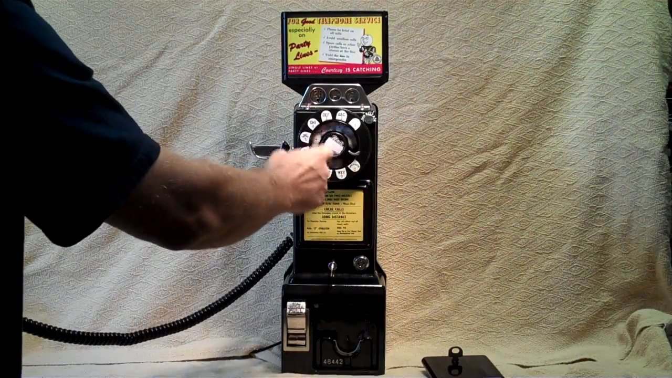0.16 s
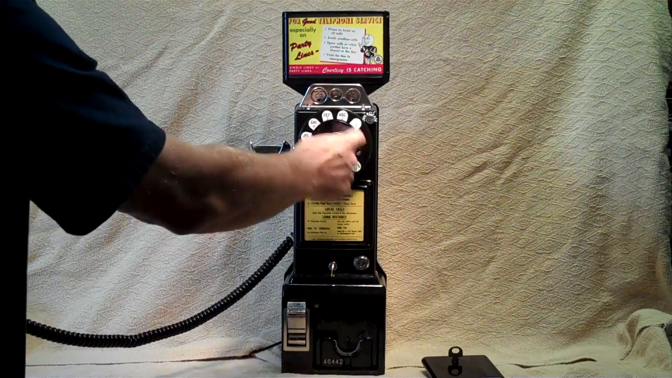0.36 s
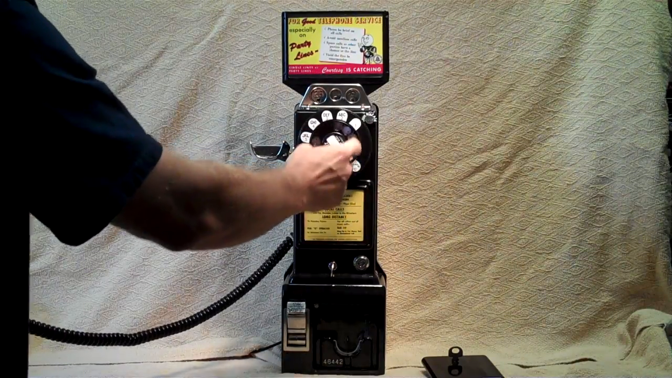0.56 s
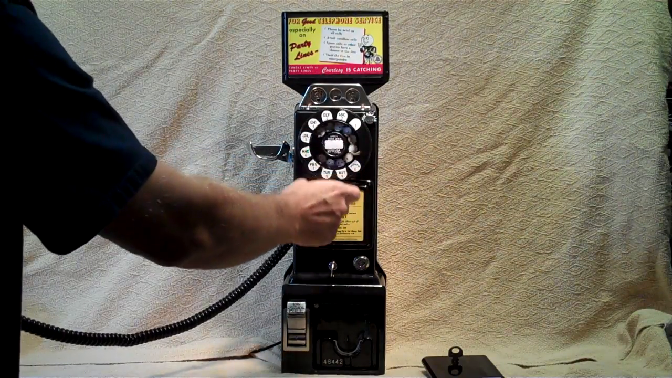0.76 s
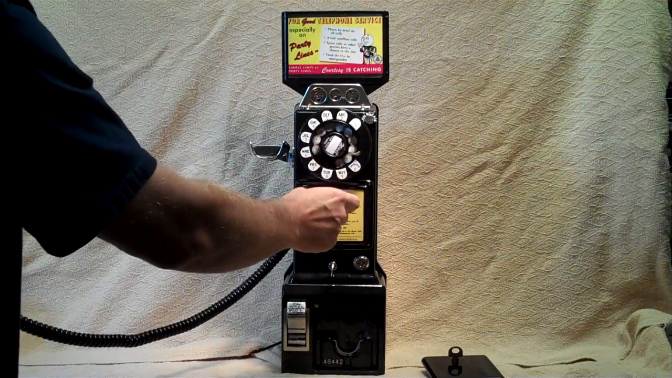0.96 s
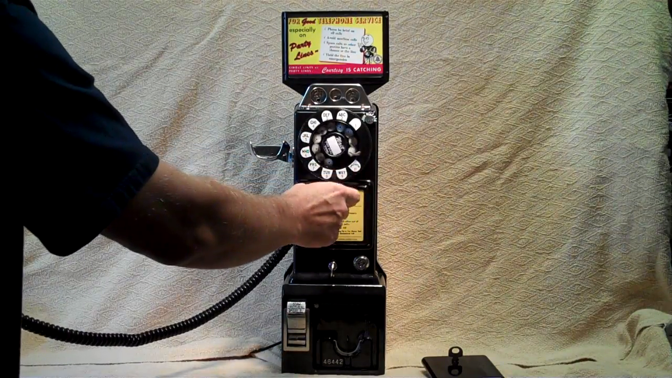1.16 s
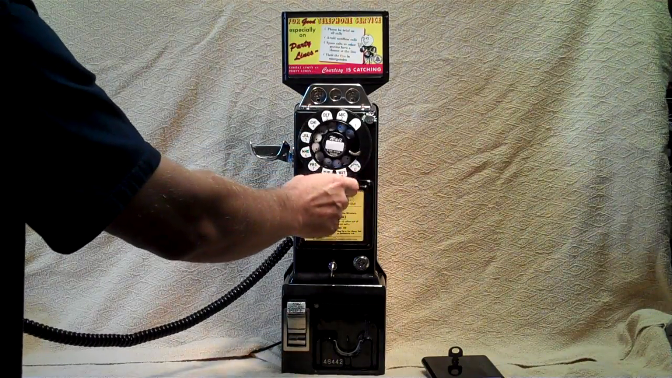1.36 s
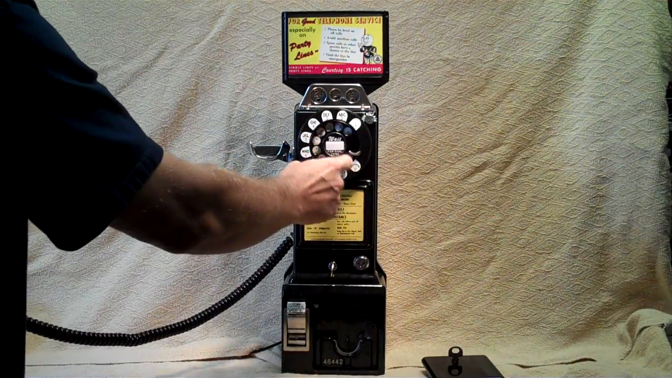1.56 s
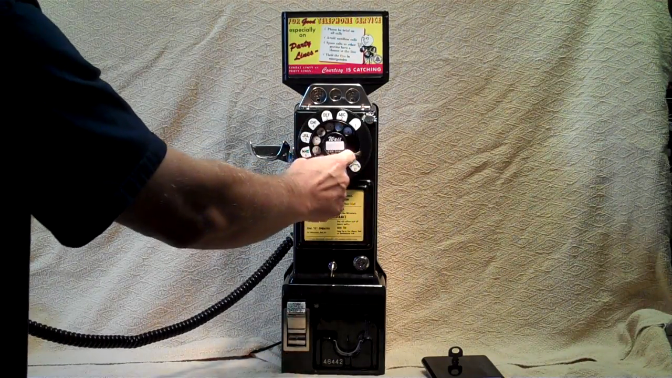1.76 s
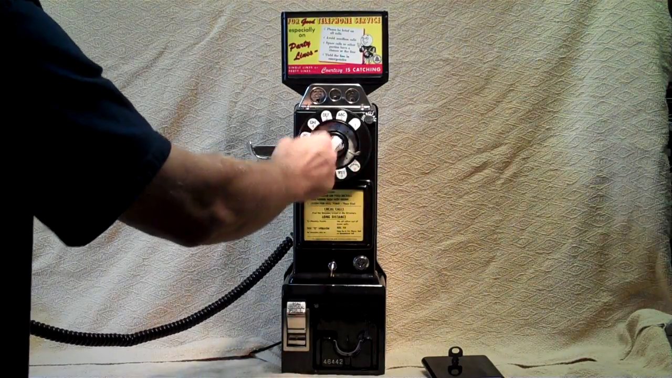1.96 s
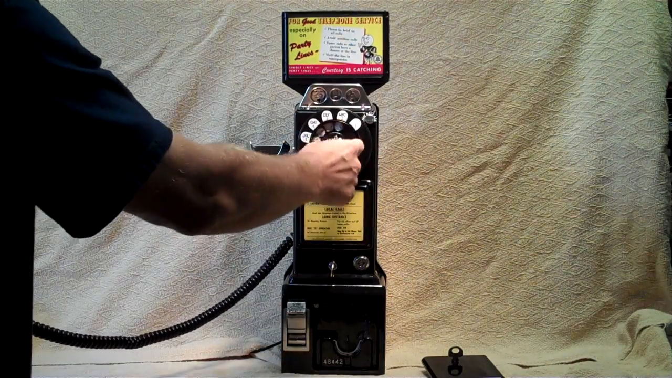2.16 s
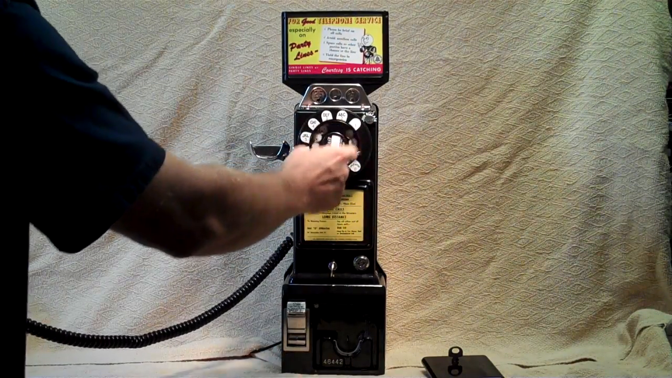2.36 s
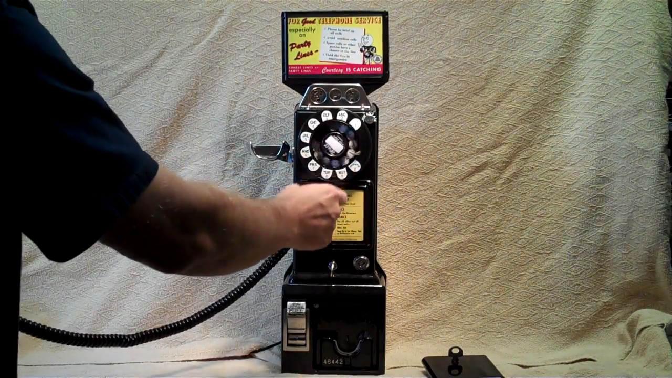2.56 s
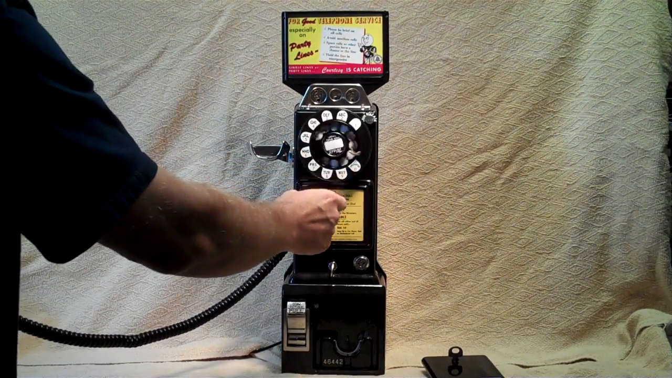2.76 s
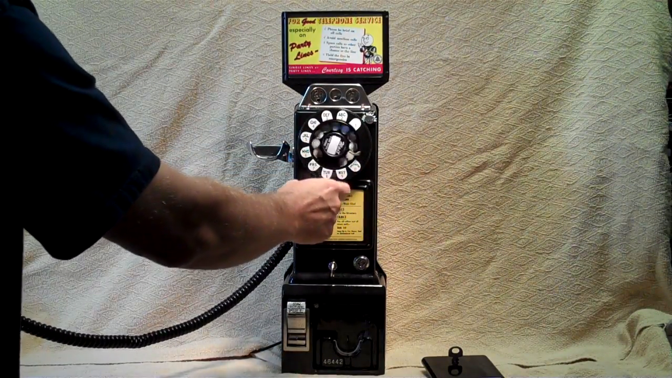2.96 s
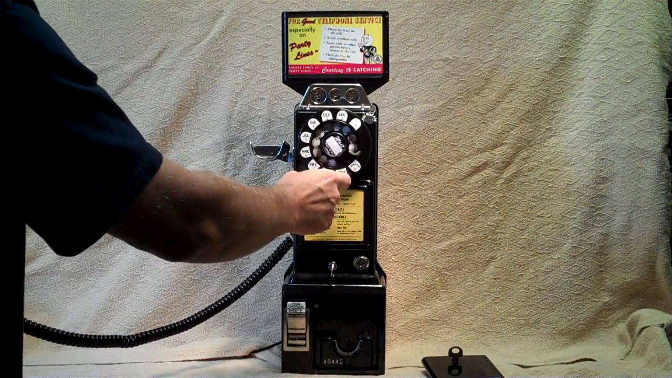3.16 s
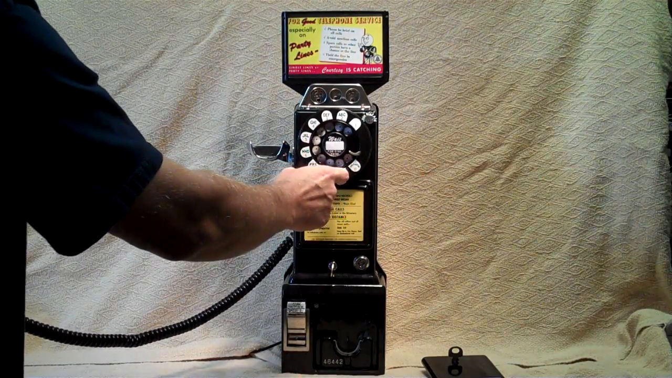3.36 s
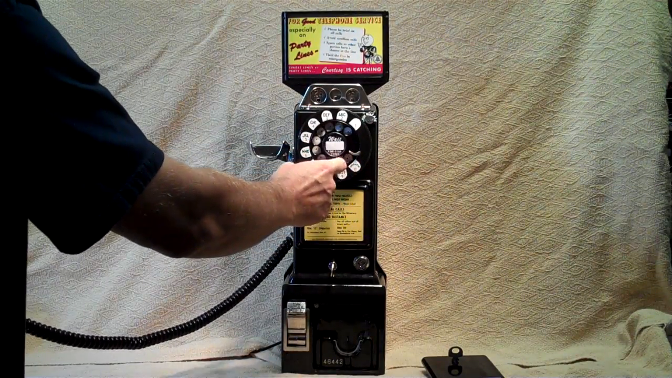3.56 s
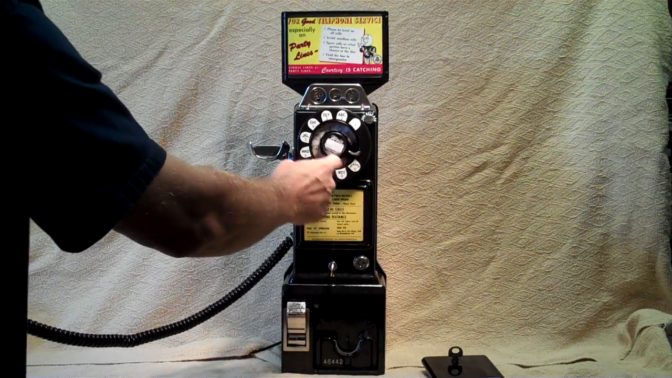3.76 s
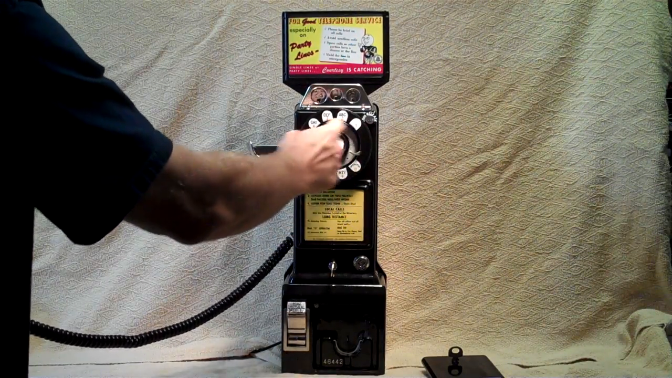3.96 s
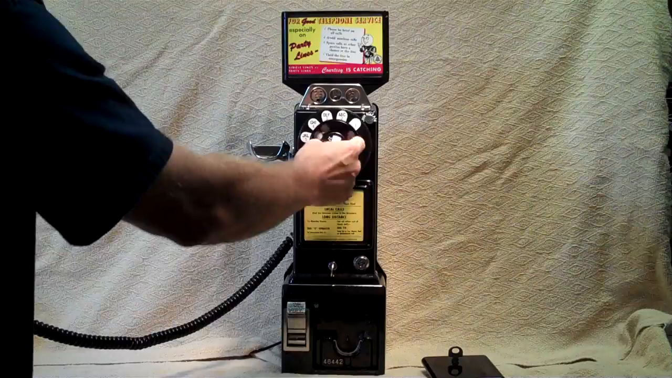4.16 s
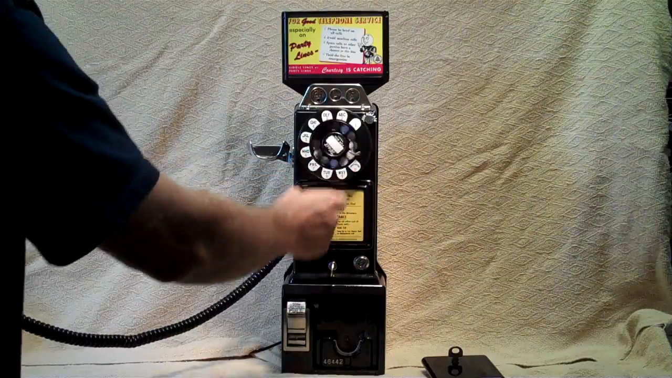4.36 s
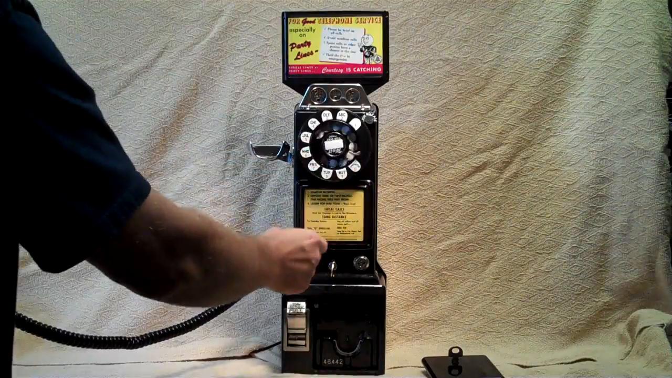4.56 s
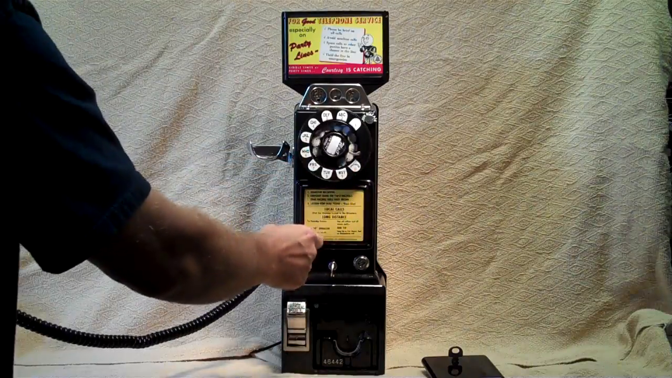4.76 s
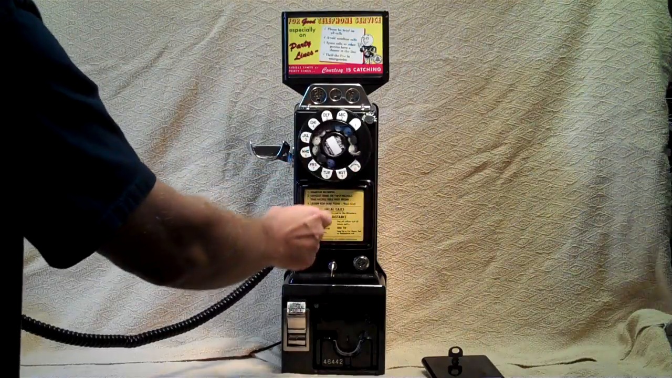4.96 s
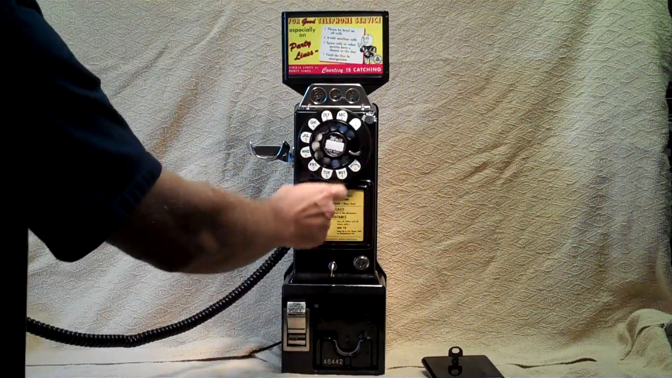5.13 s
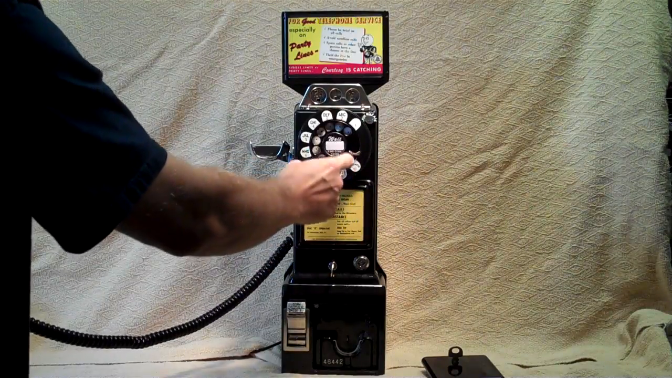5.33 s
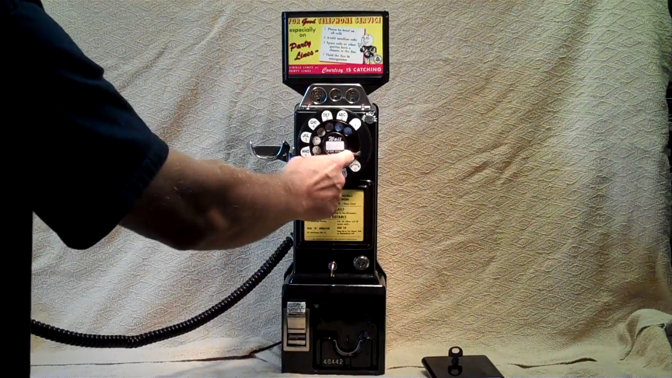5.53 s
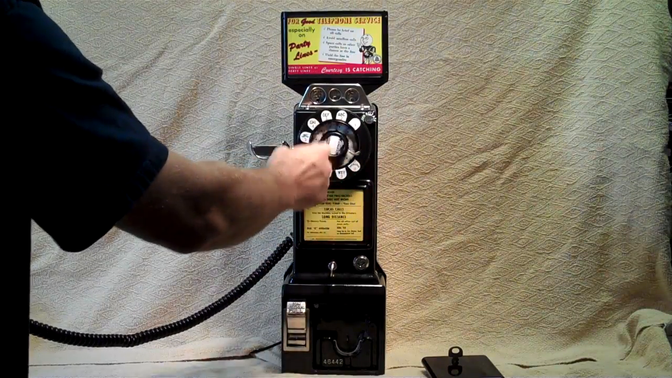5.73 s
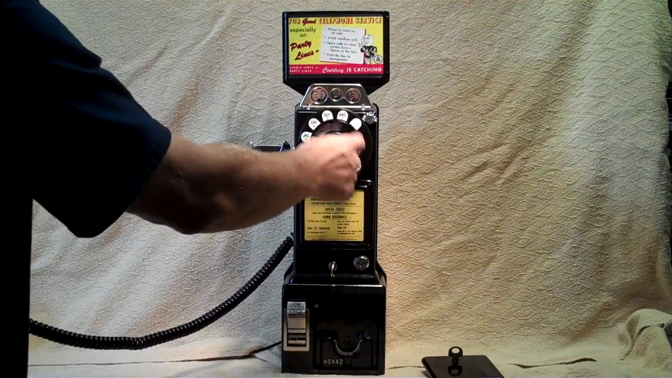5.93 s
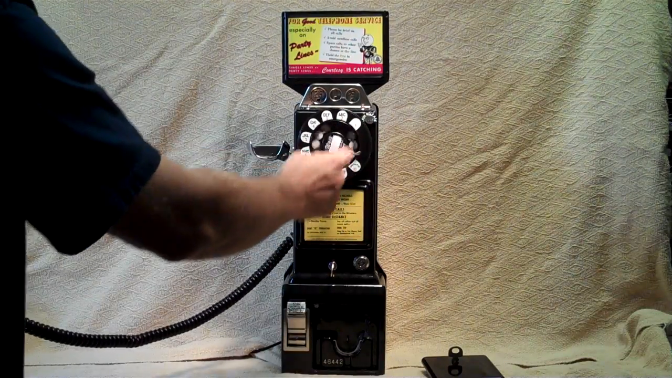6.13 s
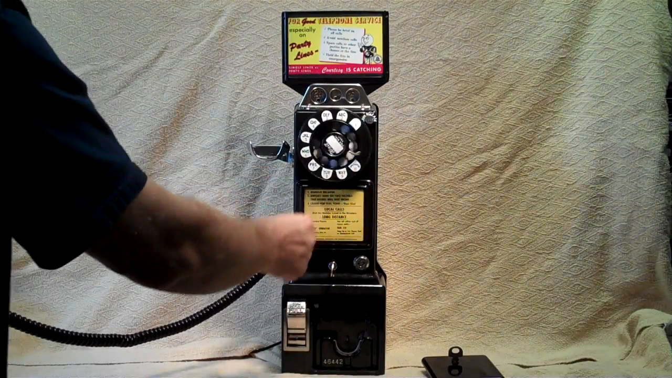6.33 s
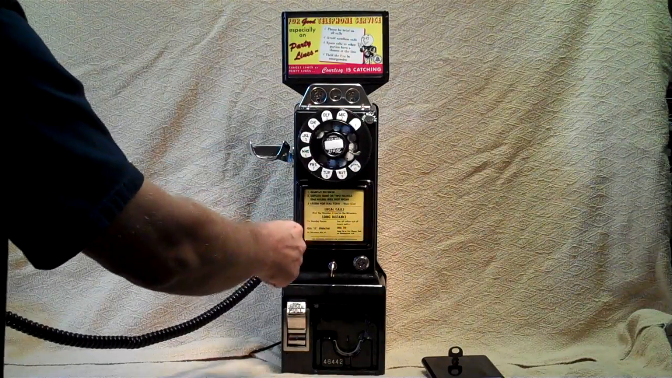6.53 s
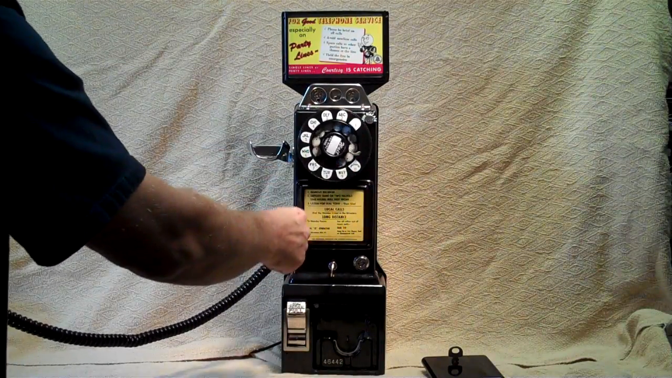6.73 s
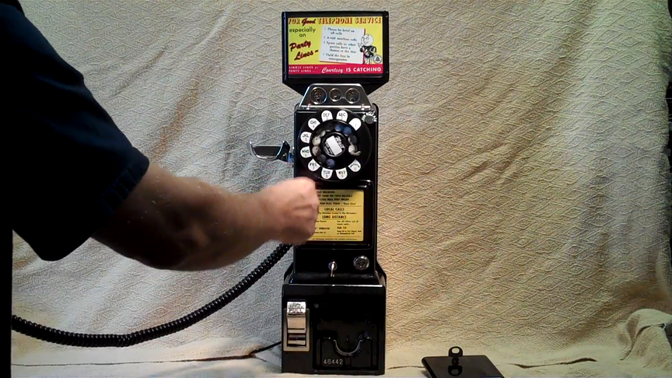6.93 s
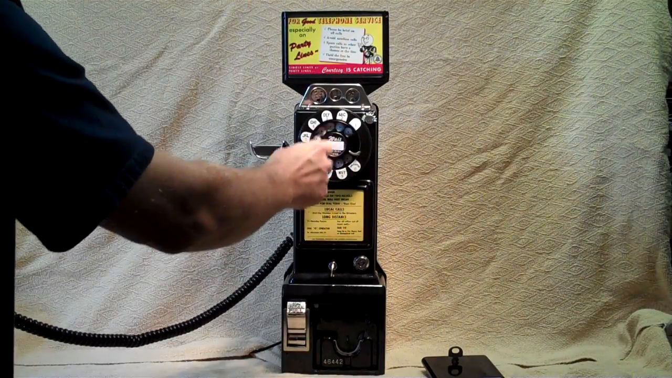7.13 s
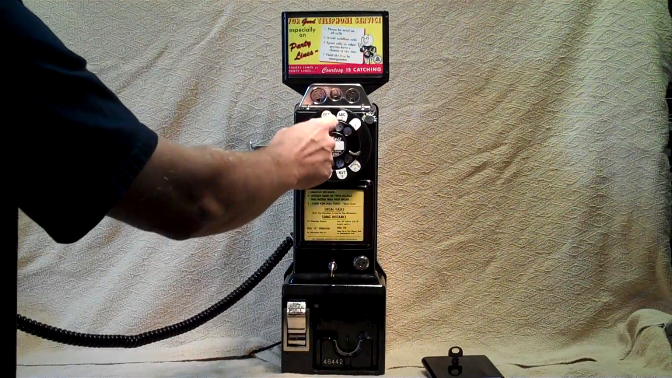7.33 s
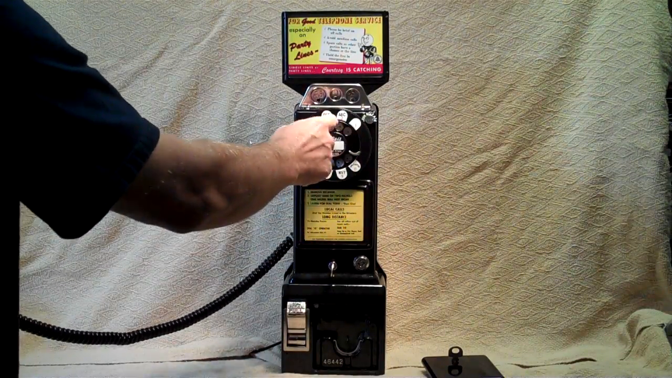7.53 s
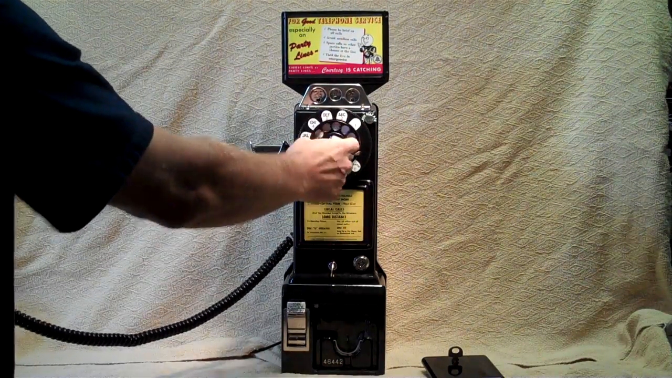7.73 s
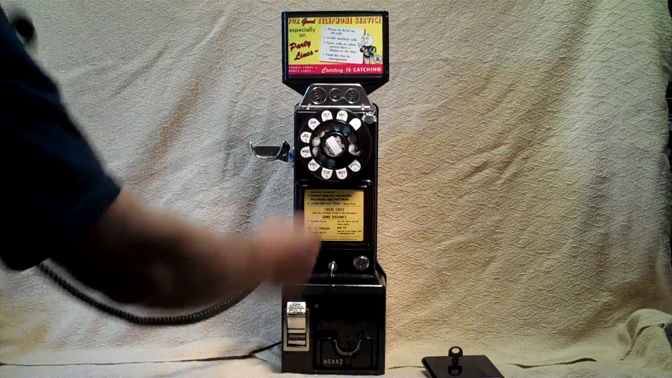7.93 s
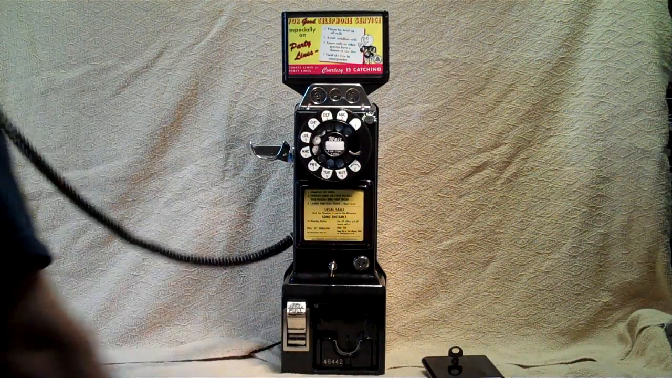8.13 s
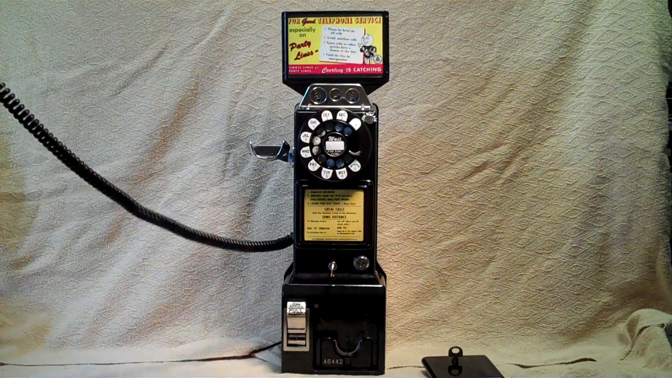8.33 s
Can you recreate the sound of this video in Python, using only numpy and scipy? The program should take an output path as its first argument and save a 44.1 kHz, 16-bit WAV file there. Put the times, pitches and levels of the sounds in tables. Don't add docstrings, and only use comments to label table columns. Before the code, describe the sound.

A steel rotary dial on a payphone, miked close in a small curtained room with faint hiss. After light nail taps, a gritty scrape winds from 0.16 s to a hard knock at 0.46; the finger clicks free at 0.52 and the wheel whirs back, bright and rasping over a low gear hum, with eight faint even ticks, clacking home at 1.46. Fumbling clicks lead to a second wind at 1.87, a double knock at 2.2 and a ten-tick return ending at 3.42. The third winds at 3.8, stops at 4.12 and returns until 5.24. The fourth winds at 5.65, stops at 6.0 with a small bounce, and whirs until 7.2. After a few taps, a quick short scrape at 7.64 hits the stop hardest at 7.72; a brief three-tick whir clacks home at 8.2, with a barely audible dull step just before. Short room decay and a tiny click finish.

```python
import sys
import numpy as np
from scipy import signal
from scipy.fft import rfft, irfft, next_fast_len
from scipy.io import wavfile
from scipy.ndimage import uniform_filter1d, map_coordinates

SR = 44100
rng = np.random.default_rng(int(sys.argv[2]) if len(sys.argv) > 2 else 0)


def ratio_of_db(decibels):
    return 10 ** (np.asarray(decibels, float) / 20)


def master(y):
    cut = np.clip(np.atleast_2d(y).T, -1, 1)
    pcm = np.round(cut * 32767)
    wavfile.write(sys.argv[1], SR, pcm.astype(np.int16))


N = 374409

# [t/s, treble peak level/dB, plate minus treble/dB,
# case minus treble/dB, contact time/ms]
HOMES = [
    (1.461, -12, -2.5, -14, 0.45),
    (3.423, -10.5, 2.5, -15.5, 0.66),
    (5.24, -11, 3.5, -17, 7.1),
    (7.202, -12, 5, -14.5, 0.71),
    (8.1945, -10.5, -0.5, -17, 0.84),
]
# [t/s, slip level/dB, click level/dB]
LIFTS = [
    (.521, -38.5, -21),
    (2.2678, -37, -21.5),
    (4.2174, -52, -19.5),
    (6.0612, -37.5, -18.5),
    (7.8295, -50, -19),
]
# [first tick t/s, whir level/dB, tick level/dB]
DIGITS = [
    (0.6328, 0, -55.5),
    (2.375, 0, -55),
    (4.2949, 0.5, -52.5),
    (6.1659, 0.5, -54.5),
    (7.8908, 1, -53.5),
]
# [f/Hz, width/Hz, level/dB]
CASE = [(368.4, 22.4, -1.5), (619, 22, -2), (904, 14, -27), (1180, 5.8, 4), (1452, 114, -10.5),
        (2210, 21, -28)]
# [f/Hz, width/Hz, level/dB]
PLATE = [(1970, 140, -31), (2702, 112, 9), (3010, 61, 8.5), (3840, 360, 8), (4514, 85, 11.5),
         (4605, 194, 8)]
# [f/Hz, width/Hz, level/dB]
CLACK = [(412.5, 4.9, -5), (441, 35, -7.5), (685, 28, -5), (913, 45, -8.5), (1219, 25, -2.5),
         (1518, 120, -5), (1830, 133, -3.5), (2210, 66, -8.5)]
# [f/Hz, level/dB per Hz]
BODY_BED = [(160, -52), (280, -35), (347, -17.5), (558, -11.5), (924, -3.5), (1330, -17.5), (1510, -7),
            (2600, -15), (3380, -42.5), (5720, -120)]


def unit(x):
    return x / np.sqrt(np.mean(x ** 2) + 1e-20)


def along(points, hz, column=1):
    points = np.asarray(points)
    return np.interp(np.log(hz + 1), np.log(points[:, 0] + 1), points[:, column])


def filtered(x, response):
    n = x.shape[-1]
    m = next_fast_len(n + 4096)
    return irfft(rfft(x, m) * response(np.fft.rfftfreq(m, 1 / SR)), m)[..., :n]


def modes(table, widen=1):
    def response(f):
        total = 0
        for k, (centre, width, db) in enumerate(table):
            damping = 1j * f * width * widen
            total = total + (-1) ** k * ratio_of_db(db) * damping / (centre * centre - f * f + damping)
        return total
    return response


def coloured(x, bed, table, bed_db, widen):
    sharp = unit(filtered(x, modes(table, widen)))
    broad = unit(filtered(x, lambda f: ratio_of_db(along(bed, f))))
    return unit(sharp + ratio_of_db(bed_db) * broad)


def wobble(rate):
    knots = rng.standard_normal(int(N * rate / SR) + 4)
    return map_coordinates(knots, [np.arange(N) * rate / SR])


def patchy(x, depth_db, bins, frames):
    z = signal.stft(x, nperseg=256)[2]
    field = uniform_filter1d(rng.standard_normal(z.shape), bins, 0)
    field = uniform_filter1d(field, frames, 1)
    return signal.istft(z * ratio_of_db(depth_db * unit(field)), nperseg=256)[1][:N]


def halves(x):
    low = filtered(x, lambda hz: 1 / (1 + (hz / 7000) ** 16))
    return unit(low), unit(x - low)


def blows(rows, plate, case, snap, rise, case_ms, damped=1):
    # [f/Hz, width/Hz, level/dB]
    wheel = [(5600, 450, -4), (6250, 500, 0), (6800, 500, -3), (7600, 600, -1), (8300, 500, -8),
             (10500, 2000, -32)]
    out = np.zeros(N + SR)
    t = np.arange(SR // 10) / SR * 1000
    spike = 1. * (t == 0)
    rings = [filtered(spike, lambda f: modes(table, widen)(f) / (1 + 1j * f / 8000) ** 3)
             for table, widen in ((wheel, 1), (plate, damped), (case, damped))]
    for s, db, plate_db, case_db, ms in rows:
        chatter = ratio_of_db(3.5 * np.repeat(rng.standard_normal(len(t) // 32 + 1), 32)[:len(t)])
        lives = np.array([[ms], [ms], [ms + case_ms]])
        envelope = (t / lives) ** rise * np.exp(-t / lives)
        forces = unit(rng.standard_normal((3, len(t))) * chatter * envelope) / np.sqrt(len(t))
        sound = signal.fftconvolve(forces + snap * spike, rings, axes=1)
        sound *= ratio_of_db([[db], [db + plate_db], [db + case_db]]) / np.abs(sound).max(axis=1, keepdims=True)
        out[round(s * SR):][:sound.shape[1]] += sound.sum(axis=0)
    return out[:N]


def room_hiss():
    # [f/Hz, level/dB per Hz]
    hiss_bed = [(12, -37), (20, -1), (97, 1), (336, -1), (455, 1.5), (537, 1.5), (652, -4), (1100, -2),
                (1200, -4), (1500, -3.5), (1920, -8), (3730, -7.5), (8080, -10.5), (13700, -15.5),
                (14800, -26)]
    noise = rng.standard_normal((2, N))
    return ratio_of_db(-59) * unit(filtered(noise, lambda hz: ratio_of_db(along(hiss_bed, hz))))


def room(x, near_db, near_t60):
    # [f/Hz, t60/s]
    decay = [(300, 0.63), (1500, 0.29), (4000, 0.31), (7000, 0.29), (12000, 0.3)]
    # [f/Hz, likeness 0-1]
    likeness = [(300, .9), (3500, .85), (5000, .4), (7000, .1), (12000, 0)]
    # [f/Hz, level/dB]
    wet_share = [(300, -0.5), (2000, -3), (5000, -6.5), (8000, 1.5), (12000, 0)]
    out, step = np.zeros((2, N + SR)), SR // 4
    for at in range(0, N, step):
        hz, t, z = signal.stft(rng.standard_normal((2, SR // 2)), SR, nperseg=128)
        late = ratio_of_db(-60 * t / along(decay, hz)[:, None])
        near = ratio_of_db(near_db - 60 * t / near_t60)
        turn = np.arccos(np.clip(along(likeness, hz), -1, 1)) / 2
        spread = np.array([np.cos(turn), np.sin(turn)])[..., None]
        mid, side = signal.istft(z * (late + near) * spread, SR, nperseg=128)[1]
        tail = np.array([mid + side, mid - side])
        wet = signal.fftconvolve(x[None, at:at + step], tail / np.linalg.norm(tail[0]), axes=1)
        out[:, at + 90:at + 90 + wet.shape[1]] += wet
    return filtered(out[:, :N], lambda hz: ratio_of_db(along(wet_share, hz)))


def ports(pair):
    # [f/Hz, left minus right level/dB, right leads by/rad]
    low_range = [(200, 1, 0), (1000, -.3, 0), (3500, -.4, .1), (5500, -2, .6)]
    high_range = [(6700, -8.5, 0.3), (7000, 2.5, -1), (8000, 16, 0), (8920, 11, 2), (11200, 10, 0),
                  (13400, 44, -22)]
    table = list(low_range) + list(high_range)

    def balance(hz):
        ratio = ratio_of_db(along(table, hz)) * np.exp(-1j * along(table, hz, column=2))
        return 2 * np.array([ratio, np.ones_like(hz)]) / (1 + ratio)
    return filtered(pair, balance)


def footfall():
    # [t/s, level/dB, f/Hz, length/s]
    step = (8.125, -62, 62, .022)
    s, db, hz, length = step
    t = np.arange(N) / SR - s
    push = np.sin(2 * np.pi * hz * t) + 0.61 * np.sin(2 * np.pi * 2.74 * hz * t)
    return ratio_of_db(db) * np.exp(-(t / length) ** 2) * push


def tick_times():
    pulses = [8, 10, 9, 10, 3]
    last_tick_s, slowing_s = .0893, .0004
    times = []
    for digit, home, n in zip(DIGITS, HOMES, pulses):
        bow = np.arange(n) * np.arange(n)[::-1]
        times.append(np.linspace(digit[0], home[0] - last_tick_s, n) - slowing_s / 2 * bow)
    return times


def cam_angle():
    t, turns = np.arange(N) / SR, np.zeros(N)
    for s, lift in zip(tick_times(), LIFTS):
        course = np.polyfit(s, np.arange(-len(s), 0), 2)
        turns = np.where(t > lift[0], np.polyval(course, t), turns)
    return turns


def governor():
    # [cam turns to home, inner shoe level/dB, outer shoe level/dB]
    shoes = [(-9, -53, -55.5), (-12, -53, -58.5), (-8.5, -50, -54.5), (-3, -49, -53), (-6, -56, -52),
             (0.7, -50, -54)]
    spin_up_s, hum_db = 0.057, -60
    t, (turn, *shoes_db) = np.arange(N) / SR, np.transpose(shoes)
    running = 0
    for digit, lift, home in zip(DIGITS, LIFTS, HOMES):
        ramps = np.minimum((t - lift[0]) / spin_up_s, (home[0] + 0.0059 - t) / 0.012)
        running = running + ratio_of_db(digit[1]) * np.clip(ramps, 0, 1)
    turns = cam_angle()
    return running * ratio_of_db([np.interp(turns, turn, db) for db in shoes_db] + [np.full(N, hum_db)])


def gear_hum():
    # [multiple of the governor turn], and their [level/dB]
    gear_orders = [18, 20, 22, 24]
    gear_db = [0, 6, -4.5, -4]
    # [f/Hz, level at home/dB, rise/dB per cam turn nearer home]
    panel_tones = [(600, -8, 0), (731, -11, 0), (879, -8, -.3), (917, -5, -.8), (1195, -1, 1),
                   (1485, -7, -.3)]
    body, turns, t = governor()[2], cam_angle(), np.arange(N) / SR

    def tone(db, cycles):
        level = ratio_of_db(db + 1.8 * wobble(10))
        return level * np.sin(2 * np.pi * cycles + .7 * wobble(13))
    orders = sum(tone(db, 2 * k * turns) for k, db in zip(gear_orders, gear_db))
    panels = sum(tone(db + slope_db * np.clip(turns, -10, 0), hz * t) for hz, db, slope_db in panel_tones)
    return ratio_of_db(-10.5) * body * (orders + ratio_of_db(5.0) * panels)


def tapping():
    # [t/s, treble peak level/dB, plate minus treble/dB, case minus treble/dB]
    knocks = [(0.0775, -46.5, 13, 3), (.218, -24, -1, -46), (0.4822, -22.5, 2.5, -14),
              (1.6562, -18, 0, -12.5), (1.7136, -35, -5, -14), (1.7894, -48.5, 7, 4),
              (1.924, -25, 5.5, -14), (2.023, -20, -9, -40), (2.0917, -26.5, 0.5, -12),
              (2.229, -30, 8, -14), (3.6214, -24.5, 3, -9.5), (5.504, -44, -4.5, -22.5),
              (5.5446, -52.5, 7, 3), (5.6448, -30, 1.5, -32), (7.4906, -33, 8, -7), (7.6205, -30, 7, -8)]
    # [t/s, treble peak level/dB]
    clicks = [(.0623, -45), (.145, -36.5), (.152, -43), (.558, -26), (1.8471, -19), (1.8958, -20),
              (3.695, -40.5), (3.7755, -18.5), (4.1836, -22), (5.6238, -17), (5.8702, -19), (7.48, -44),
              (7.671, -16), (7.785, -27), (8.4607, -44)]
    # plate dB, case dB, contact ms
    rows = [(*row, 2) for row in knocks]
    rows += [(*row, -20, -30, 1.4) for row in clicks]
    rows += [(s, db, -16, -21.5, 3.1) for s, _, db in LIFTS]
    return blows(rows, PLATE, CLACK, snap=1.5, rise=0.67, case_ms=4.9, damped=1.4)


def cam_ticks():
    # [f/Hz, width/Hz, level/dB]
    pulse_spring = [(2250, 170, -6), (2700, 150, 0), (3850, 400, -14)]
    grows_db, scatter_db = 0.1, 1.2
    ticks = []
    for digit, times in zip(DIGITS, tick_times()):
        for k, s in enumerate(times):
            db = digit[2] + grows_db * (k - len(times) / 2) + scatter_db * rng.standard_normal()
            ticks.append((s, db))
    snaps = [(s, db + 9, -1.5, -14, 3) for s, db in ticks]
    lands = [(s + .053, db - 4, -12, -10, 3.5) for s, db in ticks]
    snapping = blows(snaps, pulse_spring, CASE, snap=2.2, rise=0.24, case_ms=2.5)
    landing = blows(lands, pulse_spring, CLACK, snap=.3, rise=.6, case_ms=4)
    return snapping + landing


def returning():
    # [f/Hz, width/Hz, level/dB]
    whir = [(2705, 150, -14), (3220, 12, -15), (3834, 254, -9), (5050, 144, -3.5), (5900, 38, 2),
            (6800, 38, -26.5), (6900, 85, -15), (7700, 159, 5), (10000, 78, -13.5), (10280, 66, -13),
            (11600, 60, -24)]
    # [f/Hz, level/dB per Hz]
    whir_bed = [(1290, -23), (2200, -16), (3330, -15.5), (5380, -18), (5740, 2), (6420, 8.5), (7960, -2),
                (8910, -27), (13800, -42.5), (14500, -43), (14800, -49.5)]
    # [share of the turn, level/dB]
    cam_drag = [(0, 3), (.07, 2), (.2, -3), (.3, -.8), (.57, 1.8), (.66, -3), (.9, -2.5)]
    inner, outer, body = governor()
    turns = cam_angle()
    swell = np.interp(turns, *np.transpose(cam_drag), period=1)
    teeth = np.exp(-(8 * turns % 1) / 0.35) + .6 * np.exp(-3 * (32 * turns % 1))
    grain = rng.standard_normal(N) * (1.6 + teeth * ratio_of_db(wobble(83)))
    rub = grain * ratio_of_db(swell + 3.4 * wobble(480))
    low, high = halves(coloured(patchy(rub, .5, 3, 12), whir_bed, whir, bed_db=1.5, widen=1.94))
    throb = ratio_of_db(2.8 * np.cos(4 * np.pi * (turns - .15)))
    drone = coloured(rng.standard_normal(N) * throb, BODY_BED, CASE, bed_db=2.0, widen=0.8)
    return ratio_of_db(1.5) * inner * low + ratio_of_db(-1.0) * outer * high + ratio_of_db(-0.5) * body * drone


def hand():
    # [t/s, finger effort level/dB]
    winds = [
        [(0.16, -59), (0.174, -47), (0.196, -39.5), (0.244, -32), (0.412, -34), (0.432, -31.5), (0.44, -30)],
        [(1.87, -45.5), (1.902, -31), (1.916, -37), (1.924, -36), (1.942, -35), (2.03, -37), (2.04, -32),
         (2.104, -35), (2.19, -31.5)],
        [(3.8, -43), (3.814, -38), (3.992, -34), (4.058, -36), (4.07, -34), (4.115, -32.5)],
        [(5.65, -43.5), (5.682, -35.5), (5.696, -40.5), (5.874, -31.5), (5.888, -34.5), (5.99, -31.5)],
    ]
    # [t/s, finger effort level/dB]
    short_wind = [(7.64, -48), (7.676, -26.5), (7.712, -26.5)]
    # [rim level/dB, body level/dB]
    grips = [(2.5, -1), (0.5, 1), (0.5, 0), (0, 0.5), (-2, 1)]
    stroke_db = [-3, -6, -15]
    # [t/s, level/dB]
    rests = [
        (.49, -44),
        (2.24, -41.5),
        (4.16, -38.5),
        (6.04, -42),
        (7.75, -36.5),
    ]
    # [level/dB, fall/dB per s]
    rattle = [(-1, 122), (-1.5, 400), (-4.5, 233)]
    slip = [(-7, 220), (5.5, 1100), (-9, 200)]
    t, out = np.arange(N) / SR, np.zeros((3, N))
    for rows, grip_db in zip(list(winds) + [short_wind], grips):
        s, effort_db = np.transpose(rows)
        fade = np.clip(np.minimum(t - s[0] + .02, s[-1] + .025 - t) / .015, 0, 1)
        tight = np.c_[[-1, 1.5, 2]] * np.exp(np.minimum(t - s[-1], 0) / .03)
        level = np.interp(t, s, effort_db) + np.c_[stroke_db] + np.c_[[0, *grip_db]]
        out += fade * ratio_of_db(level + tight)
    for rows, rise, parts in ((rests, .02, rattle), (LIFTS, .004, slip)):
        over_db, fall = np.transpose(parts)[..., None]
        for s, db, *_ in rows:
            onset = np.clip((t - s) / rise + 1, 0, 1)
            out = np.hypot(out, onset * ratio_of_db(db + over_db - fall * np.maximum(t - s, 0)))
    return out


def winding():
    # [f/Hz, width/Hz, level/dB]
    scrape = [(2550, 48, -0.5), (3320, 140, 3), (3710, 70, 0.5), (4950, 164, 20.5), (6235, 39, 11),
              (5770, 63, -10), (6650, 68, -29.5), (7460, 37, -8.5), (7760, 22, -22), (9350, 360, 2.5),
              (10200, 52, -0.5), (10450, 84, 0)]
    # [f/Hz, level/dB per Hz]
    scrape_bed = [(1290, -72), (2200, -43), (2980, -5.5), (3250, -12.5), (3820, -4.5), (5380, -10.5),
                  (5740, 2), (6370, 1), (13800, -40.5), (14500, -28.5), (14800, -71.5)]
    clutch, rim, body = hand()
    grit = rng.standard_normal(N) * ratio_of_db(1.6 * wobble(350) + 1.25 * wobble(60))
    low, high = halves(coloured(patchy(grit, 2, 3, 11), scrape_bed, scrape, bed_db=5.5, widen=1.04))
    rumble = rng.standard_normal(N) * ratio_of_db(2 * wobble(40))
    drone = coloured(rumble, BODY_BED, CASE, bed_db=8.0, widen=1.66)
    return clutch * low + rim * high + body * drone


def homing():
    brush = [(s, db - 0.5, -4, case_db, .9) for s, db, _, case_db, _ in HOMES]
    strike = [(s + .0036, *blow) for s, *blow in HOMES]
    brushing = blows(brush, PLATE, CLACK, snap=0.097, rise=1.9, case_ms=0.39, damped=1.56)
    striking = blows(strike, PLATE, CLACK, snap=1.5, rise=0.28, case_ms=20.2, damped=1.4)
    return brushing + striking


def stopping():
    # [t/s, treble peak level/dB, plate minus treble/dB, case minus treble/dB, contact time/ms]
    stops = [
        (0.4558, -4.5, -1, -21.5, 2.2),
        (2.2001, -9, -4, -21.5, 6.5),
        (2.2089, -9.5, -7.5, -16, 5.4),
        (4.124, -6, -3, -26.5, 1.5),
        (4.1334, -11.5, -9, -19.5, 3.5),
        (6.002, -8.5, -10, -25.5, 7.6),
        (6.029, -17, 0, -19, 4.9),
        (7.7221, -1, -9.5, -27, 1.2),
    ]
    # [f/Hz, width/Hz, level/dB]
    thud = [(345, 60, 0), (415, 50, 2), (520, 90, -4), (820, 80, -6), (945, 60, -4), (1090, 60, -6),
            (1500, 120, -5), (1800, 110, -9)]
    return blows(stops, PLATE, thud, snap=.7, rise=0.19, case_ms=12.3, damped=1.18)


def scene():
    dial = stopping() + homing() + tapping() + ratio_of_db(-2.0) * (winding() + returning()) + cam_ticks()
    dial = filtered(dial, lambda hz: (1j * hz / (1j * hz + 180)) ** 4)
    wet = room(dial, near_db=14, near_t60=0.019)
    return ports(dial + wet + gear_hum() + footfall()) + room_hiss()


def band_limit(x):
    return signal.sosfilt(signal.butter(12, 15000, fs=SR, output="sos"), x)


def record(dry):
    rounded = dry / (1 + np.abs(dry / .88) ** 4) ** (1 / 4)
    mix = filtered(rounded, lambda hz: 1 / (1 + (hz / 14300) ** 90))
    return band_limit(mix)


dry = scene()
out = record(dry)
master(out)
```